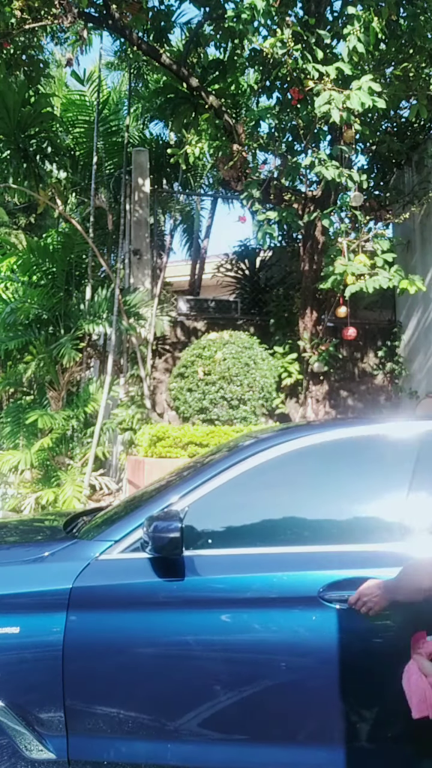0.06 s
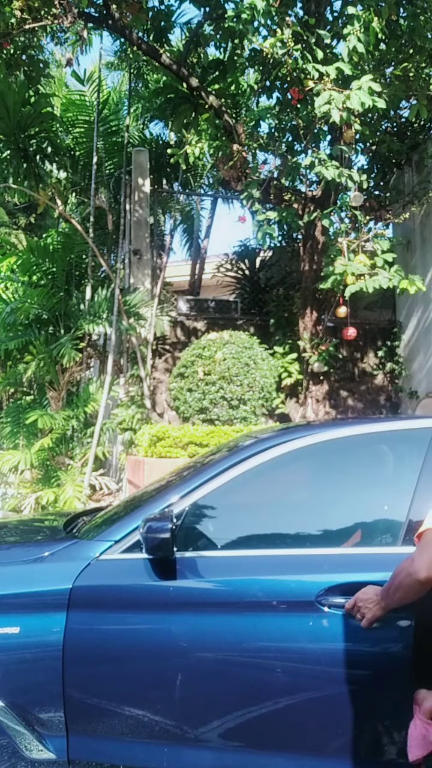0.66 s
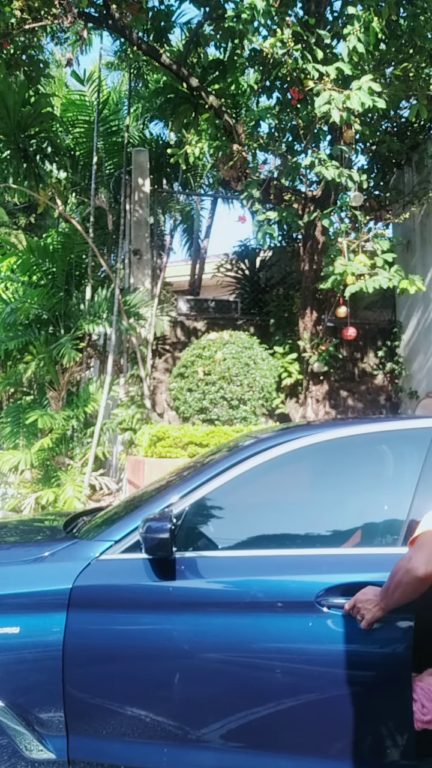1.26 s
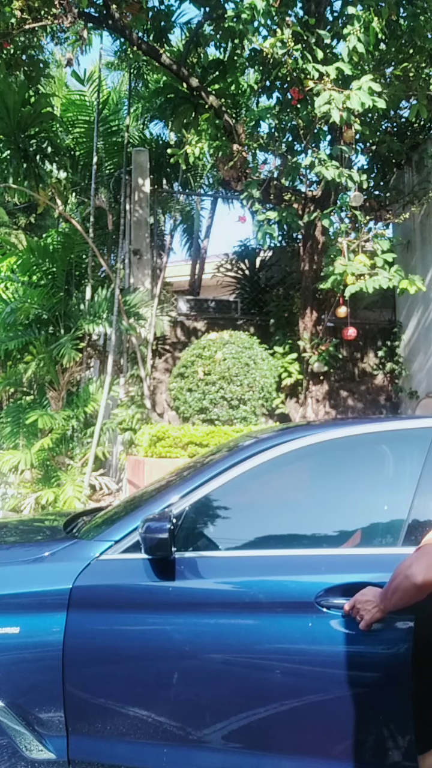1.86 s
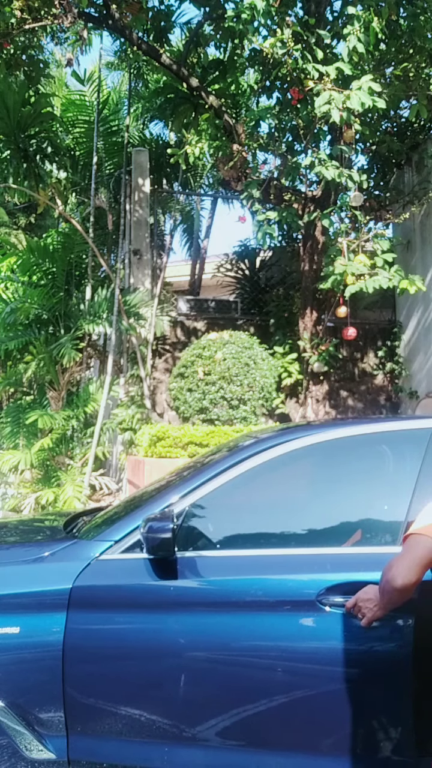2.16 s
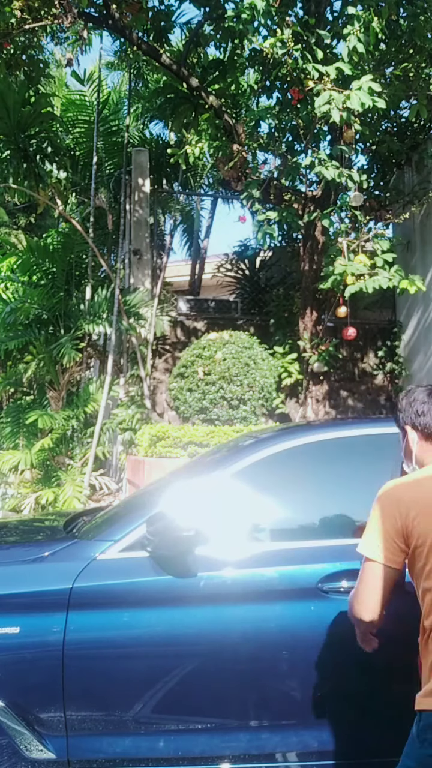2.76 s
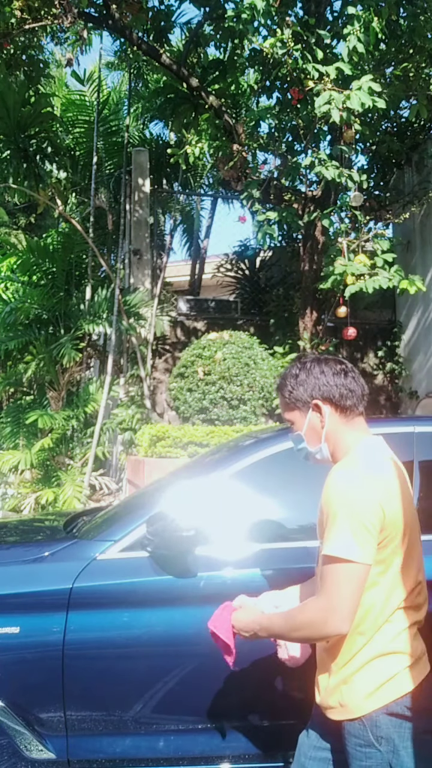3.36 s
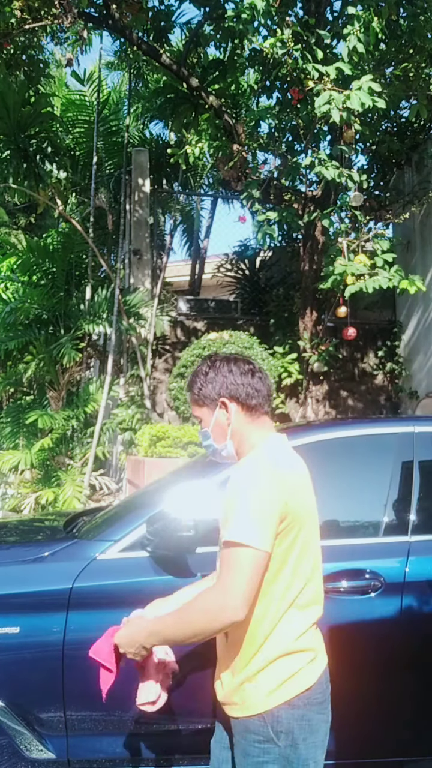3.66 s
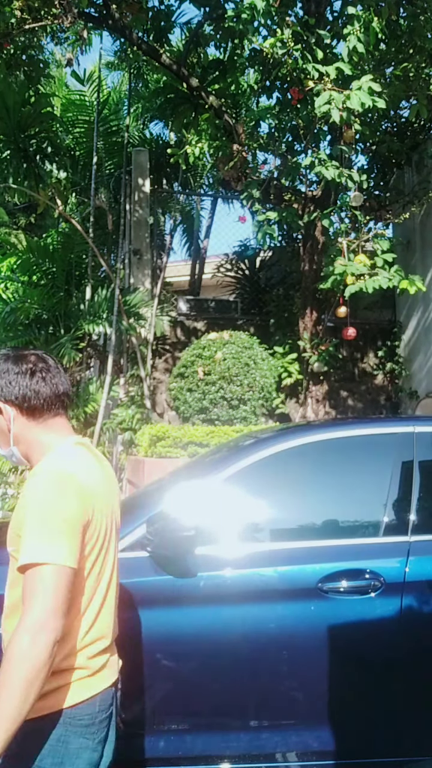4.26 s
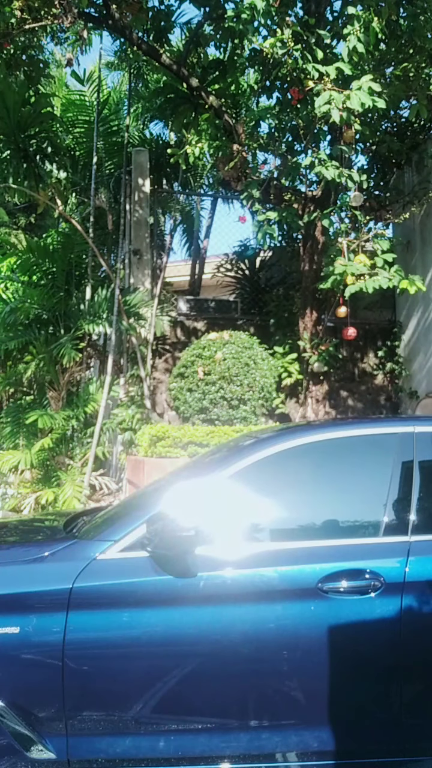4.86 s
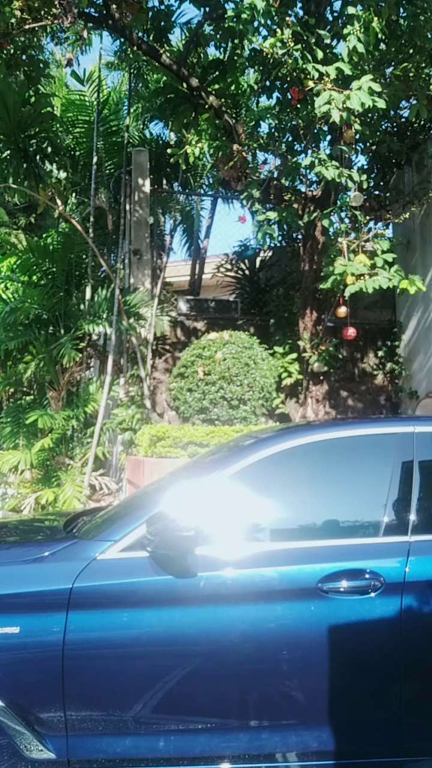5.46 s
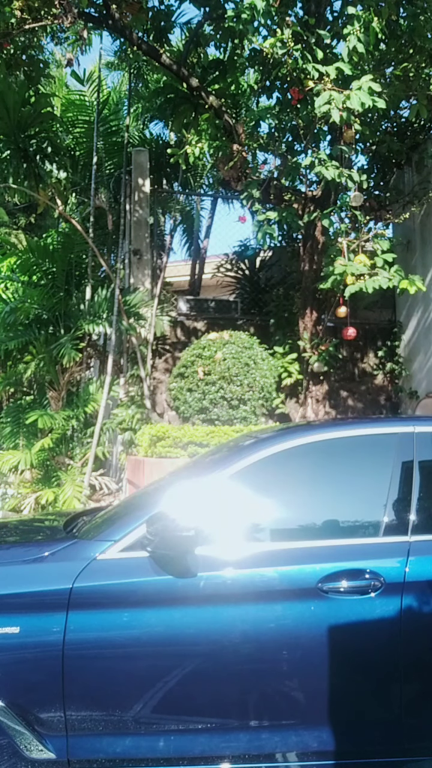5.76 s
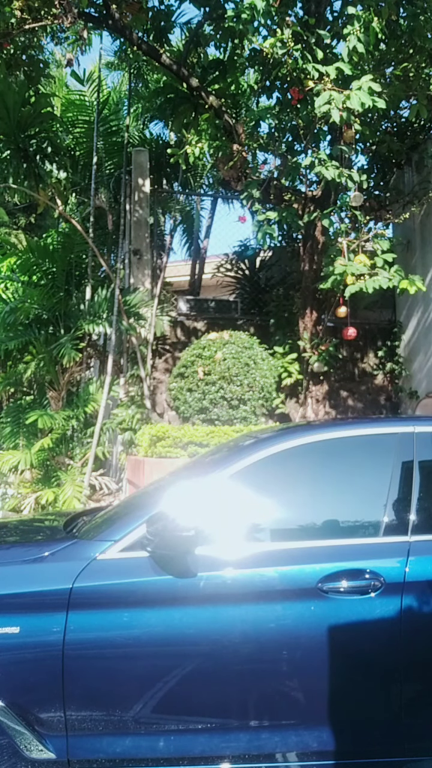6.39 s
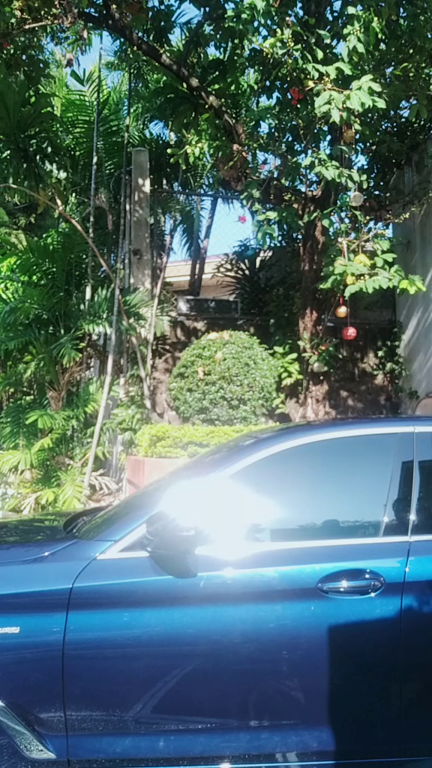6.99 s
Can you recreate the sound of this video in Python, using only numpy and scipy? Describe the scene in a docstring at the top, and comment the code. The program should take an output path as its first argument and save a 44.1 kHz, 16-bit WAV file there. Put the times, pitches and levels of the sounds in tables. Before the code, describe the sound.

A low, steady rumble of far traffic and a thin insect hiss fill an outdoor space. Close by, a handle clicks and a car door closes with a single heavy thud and a metallic catch of the latch. Quiet gritty footsteps, small ticks and swishing clothes follow. Near the end, a small hard object lands slightly further off with a sharp clack and one quick bounce.

```python
"""Shutting a car door in a garden

The handle knocks, the rubber seal meets the frame, the latch snaps, and the door panel and cabin boom.
The person walks off with scuffing steps and rustling clothes. Something hard clacks down and bounces once.
Behind it all are rumbling traffic, one far engine changing speed and a faint hiss of insects."""
import sys
import numpy as np
from scipy import signal
from scipy.fft import rfft, irfft, next_fast_len
from scipy.io import wavfile
from scipy.ndimage import uniform_filter1d

SR = 44100
rng = np.random.default_rng(int(sys.argv[2]) if len(sys.argv) > 2 else 0)


def wav_record(signal):
    """Record a signal, one row per channel, as 16-bit PCM in the file named by sys.argv[1]."""
    frames = np.transpose(np.atleast_2d(signal))
    bounded = np.clip(frames, -1, 1)
    # unit amplitude maps onto the largest positive 16-bit level
    quanta = np.round(bounded * 32767).astype(np.int16)
    wavfile.write(sys.argv[1], SR, quanta)


N = 314433
T = np.arange(N) / SR

# In the tables, fade_s is the time to die away by 60 dB, and contact_s is how long a blow lasts.
# A "colour" says how strong a noise is from low to high. Levels are relative, not final loudness.
# Pushes on the panel, by hand and as the door lands and rebounds: start_s, level_db, contact_s
PANEL_PUSHES = [(1.21, -30, 0.0028), (2.121, -26, 0.0045), (2.6492, -3, 0.0064), (2.69, -7, 0.0061)]
# The buffers stop the door with a blow the other way: start_s, level_db, contact_s
BUFFER_STOPS = [(2.678, -2.5, 0.00482)]
# Tones of the door's wide metal panel: pitch_hz, level_db, fade_s
PANEL_TONES = [(54.3, -39.5, 0.51), (77.6, -23.5, 0.36), (105.4, -29, 0.26), (130, -21.5, 0.22),
               (155, -24, 0.066), (176, -37, 0.15), (243.6, -36, 0.36)]
# Air squeezed into the cabin: start_s, level_db, length_s
AIR_PUSHES = [(2.641, -14, 0.017), (2.677, 7, 0.0096)]
# The cabin's boom: pitch_hz, level_db, fade_s
CABIN_TONES = [(26.7, -36, 0.42)]
# The door meets its frame and settles: start_s, knock_db, contact_s, seal_db
FRAME_HITS = [(2.517, -22.5, 0.0014, -78), (2.603, -23, 0.0018, -63), (2.619, -10, 0.0014, -45),
              (2.6305, -9, .0007, -39.5), (2.634, -3, 0.00015, -44), (2.644, -5.5, 0.00094, -34.5),
              (2.677, -17, 0.000099, -37), (2.690, -6.5, 0.00057, -45.5), (2.717, -18, 0.0015, -48)]
# Tones of the door's shell: pitch_hz, level_db, fade_s
SHELL_TONES = [(316, -59, 0.29), (407, -36.5, 0.16), (438, -40, 0.2), (480, -47, 0.2), (582.4, -37, 0.16),
               (694, -38.5, 0.1), (777, -41, 0.1), (1390, -30, 0.049), (1966, -37.5, 0.061)]
# The seal being squashed: pitch_hz, level_db
SQUASH_COLOUR = [(200, 4), (400, 3), (650, 6.5), (1050, -2.5), (1400, -13), (1750, -9), (2300, -13),
                 (3200, -33), (4500, -31), (7000, -25), (16000, -49)]
# The latch snaps over its catch, notch by notch: start_s, rasp_db, ring_db
LATCH_SNAPS = [(2.6365, -57, -49), (2.6488, -33.5, -34.5), (2.6624, -31.5, -41), (2.673, -37.5, -51)]
# The latch's rasp: pitch_hz, level_db
RASP_COLOUR = [(900, -28), (2100, -5), (2800, -1.5), (3700, -6.5), (4400, -8.5), (5600, -11), (6400, 0),
               (7500, -2), (8700, -6.5), (10800, -17.5), (13500, -5.5), (16000, -12)]
# The latch's ring: pitch_hz, level_db, fade_s
LATCH_TONES = [(3710, -2, 0.032), (6600, -11, 0.031), (7500, 0, 0.034), (7700, -1, .04)]
# The steel edge clashes as the door shuts fully: start_s, level_db, rise_s, fade_s
EDGE_CLASH = [(2.679, -34, 0.0013, 0.047)]
# The noise of that clash: pitch_hz, level_db
EDGE_COLOUR = [(900, -26), (1400, 15), (1750, -8), (2300, 6), (3000, 3.5), (4200, -11), (6400, -5),
               (9000, -34), (16000, -32)]
# The handle is let go and snaps home: start_s, level_db
HANDLE_SNAPS = [(2.0728, -5.5), (2.0772, -1), (2.0822, 0.5)]
# Tones of the handle: pitch_hz, level_db, fade_s
HANDLE_TONES = [(457, -53, 0.042), (707, -34.5, 0.029), (810, -48, 0.05), (1235, -53, 0.041),
                (1500, -55, .03), (2150, -46, 0.02)]

# A hard thing lands and bounces once: start_s, level_db, contact_s
CLACK_HITS = [(5.8746, 1, 0.00056), (5.8770, 2, 0.00012), (5.9019, -1, 0.00028)]
# Tones of the hard thing: pitch_hz, level_db, fade_s
CLACK_TONES = [(588.4, -71, 0.046), (775, -40, 0.035), (1060, -38, 0.016), (1330, -33, 0.038),
               (1406, -33.5, 0.028), (1945, -37.5, 0.033), (2150, -36.5, 0.036), (2640, -46, 0.044),
               (2930, -64, 0.019), (4490, -44, 0.016), (6060, -44, .015), (6350, -43.5, 0.018)]
# Grit crunches under it: start_s, level_db, rise_s, fade_s
CRUNCHES = [(5.8745, -40, 0.0006, 0.025), (5.877, -35, 0.0023, 0.036), (5.902, -46, 0.00054, 0.079),
            (5.912, -54, 0.0046, 0.6)]
# The noise of that crunch: pitch_hz, level_db
CRUNCH_COLOUR = [(330, -34), (750, 7), (1100, -2), (1400, 3.5), (1750, 4.5), (2250, 3), (2900, -6),
                 (3500, -12.5), (6500, -12), (9000, -25), (16000, -21)]
# Soles scuff the ground: start_s, sole_db, grit_db, fade_s
FOOTSTEPS = [(3.617, -55.5, -68, 0.16), (4.13, -56, -68, 0.11), (4.33, -63, -73, .28),
             (4.645, -60, -81, 0.53), (5.352, -52.5, -67, .2), (6.410, -55, -68, 0.28),
             (6.995, -57.5, -78, 0.12)]
# The noise of a sole: pitch_hz, level_db
SOLE_COLOUR = [(400, -1), (1000, -1), (1450, 5.5), (1700, -10), (2100, 7.5), (2600, -9.5), (3300, -3),
               (5000, -15), (7000, -8), (9500, -55), (16000, -52)]
# Clothes swish during the walk: start_s, level_db, rise_s, fade_s
CLOTH_SWISHES = [(3.25, -62.5, 0.13, .5), (3.405, -62.5, .025, 0.37), (3.62, -69.5, 0.055, 0.54),
                 (4.054, -57, 0.032, 0.29), (4.642, -58.5, 0.02, .5), (5.296, -54.5, 0.014, 0.073),
                 (6.30, -69, .032, 0.78)]
# The noise of cloth and of grit underfoot: pitch_hz, level_db
SWISH_COLOUR = [(1200, -32), (2100, 4), (3100, 6.5), (4300, 0.5), (5500, 4.5), (7000, 8), (9000, -3.5),
                (11500, -3.5), (14000, 1.5), (16000, 0)]
# Small ticks of hand and grit: start_s, level_db, fade_s, pitch_hz
SMALL_TICKS = [(1.204, -45, 0.024, 1390), (1.209, -47.5, .06, 1945), (1.569, -58.5, 0.12, 6350),
               (1.59, -55.5, 0.036, 7300), (2.950, -50.5, 0.029, 2620), (3.622, -58, 0.12, 2160),
               (3.79, -52, 0.026, 1850), (4.053, -48, 0.082, 3018), (4.055, -48, 0.04, 4475),
               (4.061, -53, .033, 2000), (4.287, -54.5, 0.054, 2110), (4.929, -39.5, 0.02, 2050),
               (5.065, -51.5, 0.056, 2120), (6.032, -52, 0.055, 1360), (6.755, -50, 0.023, 3940),
               (7.019, -53.5, 0.069, 3700)]
# The crack in each tick: pitch_hz, level_db
CRACK_COLOUR = [(300, 5), (900, 10.5), (1400, 0), (2050, 4.5), (2500, -5), (3000, 4), (4000, -5.5),
                (4800, -11.5), (5600, -10.5), (6800, 1.5), (9000, -26), (14000, -15), (16000, -23)]

# How far traffic rises and falls: time_s, rumble_db, tyre_db
TRAFFIC_LEVELS = [(0.0, -66.5, -62.5), (1.17, -70, -61.5), (6.02, -66, -60.5), (7.13, -66.5, -61)]
# The road's low rumble: pitch_hz, level_db
RUMBLE_COLOUR = [(11, -39), (20, -6.5), (42, 3), (65, -7.5), (85, 4), (125, -2), (150, -3), (200, -6),
                 (260, -15.5), (300, -45), (390, -49)]
# The rush of tyres: pitch_hz, level_db
TYRE_COLOUR = [(160, -20), (280, -4.5), (343, -6), (406, -3), (560, -2), (600, -1.5), (747, -1), (856, -1),
               (1800, -11.5), (2320, -11.5), (4570, -22), (6750, -23.5), (8850, -27.5), (15200, -26.5),
               (16000, -34)]
# The tyres' treble, used only as a change around its average: time_s, level_db
TREBLE_LEVELS = [(0.0, -67.5), (1.53, -69), (2.42, -72.5), (3.33, -68.5), (7.13, -69.5)]
# How fast the far engine fires: time_s, firing_hz
ENGINE_SPEED = [(0.0, 75.6), (0.3, 74.4), (0.67, 64.15), (2.1, 50.1), (2.8, 49.46), (3.22, 51.5),
                (3.43, 59.55), (3.99, 66.7), (5.2, 68.95), (5.98, 75), (7.13, 70.8)]
# The engine's tones: multiple_of_firing_rate, level_db
ENGINE_TONES = [(1, 2), (2, -23.5), (3, -15.5)]
# Firing rates at which the exhaust booms: pitch_hz, width_hz, boost_db
EXHAUST_BOOMS = [(62.8, 1.95, 8.5), (71.55, 1.9, 4.6)]
# Insects call in swells, about twice a second: peak_s, level_db
INSECT_CALLS = [(.33, -72.5), (.85, -75), (1.38, -76.5), (1.98, -83.5), (3.28, -73.5), (3.87, -73),
                (4.8, -84), (5.3, -71.5), (5.48, -70), (6.05, -77), (6.53, -74.5)]
# The insects' hiss: pitch_hz, level_db
HISS_COLOUR = [(5000, -29), (6200, -7.5), (6750, -2), (7250, -3.5), (7800, -11.5), (8800, -18.5),
               (11500, -23), (13600, -10), (16000, -15.5)]
# Echoes from the ground and walls: delay_s, level_db
ECHOES = [(0.011, -15), (0.023, -32), (.033, -24), (0.058, -26)]


def door_boom():
    """The panel bends in and out as the door lands, and the trapped air sways in the cabin."""
    force = blows(shudder() + PANEL_PUSHES) - blows(BUFFER_STOPS)
    return ring(force, PANEL_TONES) + ring(blows(AIR_PUSHES), CABIN_TONES)


def shudder(count=7, start_s=2.1455, gap_s=0.008, contact_s=0.0058):
    """The panel shudders as the door starts to swing: a quick run of soft, uneven pushes."""
    pushes = []
    for k, place in enumerate(np.linspace(-1, 1, count)):
        db = -33 + 1.5 * place ** 2 + 2 * rng.standard_normal()
        pushes.append((start_s + k * gap_s, db, contact_s))
    return pushes


def door_clatter(seal_rise_s=0.0035, seal_fade_s=0.1):
    """The door knocks on its frame and squashes the seal; the latch snaps and the steel edge clashes."""
    knocks = blows([(s, db, contact) for s, db, contact, _ in FRAME_HITS])
    shell = low_cut(ring(knocks, SHELL_TONES), hz=181)
    squashes = bursts([(s, db, seal_rise_s, seal_fade_s) for s, _, _, db in FRAME_HITS])
    seal = squashes * noise(SQUASH_COLOUR)
    return shell + seal + door_latch() + bursts(EDGE_CLASH) * noise(EDGE_COLOUR)


def door_latch(rise_s=0.0008, fade_s=0.049, contact_s=0.00005):
    """The steel latch rasps over its catch and rings at each notch."""
    slides = bursts([(s, db, rise_s, fade_s) for s, db, _ in LATCH_SNAPS])
    strikes = blows([(s, db, contact_s) for s, _, db in LATCH_SNAPS])
    return slides * noise(RASP_COLOUR, grain_db=1.5) + ring(strikes, LATCH_TONES)


def door_handle(contact_s=0.00037, gap_s=0.0208, spring_hz=6760, spring_width_hz=880):
    """The handle is gripped, snaps home with a faint ring of its spring, and bounces ever more softly."""
    grip = (1.3, -16, 0.0011)   # start_s, level_db, contact_s
    home_s = HANDLE_SNAPS[-1][0]
    bounces = [(home_s + (k + 1) * gap_s, -13 - 2 * k) for k in range(3)]
    knocks = blows([grip] + [(s, db, contact_s) for s, db in HANDLE_SNAPS + bounces])
    body = low_cut(ring(knocks, HANDLE_TONES), hz=337)
    rise_s, fade_s = 0.0008, 0.034
    spring_level = bursts([(s, db - 60, rise_s, fade_s) for s, db in HANDLE_SNAPS])
    spring = narrow_band(rng.standard_normal(N), spring_hz, sharpness=spring_hz / spring_width_hz)
    return body + spring_level * spring


def clack():
    """A hard, hollow thing lands on gritty ground and bounces."""
    body = low_cut(ring(blows(CLACK_HITS), CLACK_TONES), hz=583)
    crunch = bursts(CRUNCHES) * noise(CRUNCH_COLOUR, grain_db=2.5)
    return body + crunch


def walking(rise_s=0.0055, boost_db=2.0, flutter_db=1.34):
    """Soles scuff over grit and clothes rustle, both with a rough, grainy sound."""
    scuffs = bursts([(s, db, rise_s, fade) for s, db, _, fade in FOOTSTEPS])
    grit = [(s, db, rise_s, fade) for s, _, db, fade in FOOTSTEPS]
    steps = scuffs * noise(SOLE_COLOUR, grain_db=5.0)
    rustle = bursts(CLOTH_SWISHES + grit) * noise(SWISH_COLOUR, grain_db=5.5)
    return (steps + rustle) * from_db(boost_db + flutter_db * drift(rate_hz=23))


def ticks(rise_s=0.0016, ring_db=-2.0, crack_db=-5.5):
    """Each tick of hand or grit is a tiny crack with a short ring at its own pitch."""
    crack = from_db(crack_db) * noise(CRACK_COLOUR, grain_db=4.0)
    hiss = rng.standard_normal(N)
    sound = np.zeros(N)
    for s, db, fade, hz in SMALL_TICKS:
        tone = from_db(ring_db) * narrow_band(hiss, hz, sharpness=13)
        sound += bursts([(s, db, rise_s, fade)]) * (crack + tone)
    return sound


def traffic(rumble_boost_db=10.0, flutter_db=0.5):
    """A far road rumbles and tyres rush; the treble comes and goes a little."""
    rumble_db, tyre_db = in_time(TRAFFIC_LEVELS)
    treble_db, = in_time(TREBLE_LEVELS)
    rumble = from_db(rumble_db + rumble_boost_db) * noise(RUMBLE_COLOUR)
    tyres = from_db(tyre_db + flutter_db * drift(rate_hz=8.3)) * noise(TYRE_COLOUR)
    treble_change = from_db(treble_db - treble_db.mean()) - 1
    return rumble + tyres + treble_change * low_cut(tyres, hz=2400, order=1)


def far_engine(base_db=-58.5, cruise_hz=70.4, smooth_s=0.62, waver=0.00798, flutter_db=1.5):
    """Only an engine's lowest tones carry this far. It is louder when fast and when speeding up."""
    hz, = in_time(ENGINE_SPEED)
    speed_db = 0.25 * (hz - cruise_hz)
    pull_db = 0.1374 * uniform_filter1d(np.gradient(hz) * SR, int(smooth_s * SR))
    exhaust_db = sum(db / (1 + ((hz - centre) / width) ** 2) for centre, width, db in EXHAUST_BOOMS)
    level_db = base_db + speed_db + pull_db + exhaust_db
    phase = 2 * np.pi * np.cumsum(hz * (1 + waver * drift(rate_hz=10.8))) / SR
    drone = sum(from_db(db) * np.sin(multiple * phase) for multiple, db in ENGINE_TONES)
    return from_db(level_db + flutter_db * drift(rate_hz=11.0)) * unit_level(drone)


def insects(swell_width_s=0.073, steady_db=-80.5, boost_db=3.5, flutter_db=1.5):
    """Insects in the trees call in swells over a thin, steady hiss."""
    swells = sum(from_db(db) ** 2 * np.exp(-((T - s) / swell_width_s) ** 2) for s, db in INSECT_CALLS)
    level = np.sqrt(from_db(steady_db) ** 2 + swells)
    return level * from_db(boost_db + flutter_db * drift(rate_hz=110)) * noise(HISS_COLOUR)


def garden(x, early_db, early_fade_s, late_db, late_fade_s, dull_hz):
    """Add echoes from ground and walls, and a shorter and a longer scatter from the leaves."""
    age = T[:SR]
    echo = np.zeros(SR)
    for db, fade in ((early_db, early_fade_s), (late_db, late_fade_s)):
        tail = rng.standard_normal(SR) * from_db(-60 * age / fade) * np.minimum(age / .012, 1)
        echo += from_db(db) * tail / np.linalg.norm(tail)
    for delay, db in ECHOES:
        echo[int(delay * SR)] += from_db(db)
    echo = signal.sosfilt(signal.butter(1, dull_hz, fs=SR, output="sos"), echo)
    return x + signal.fftconvolve(x, echo)[:N]


def blows(rows):
    """Each blow is a smooth hump of force: the longer the contact, the duller the sound."""
    force = np.zeros(N)
    for s, db, contact in rows:
        start = int(s * SR)
        progress = (np.arange(int(contact * SR) + 1) + .5) / (contact * SR)
        hump = np.sin(np.pi * np.minimum(progress, 1)) ** 2
        force[start:start + len(hump)] += from_db(db) * hump / (hump.sum() + 1e-12)
    return force


def ring(force, tones):
    """A struck object rings with its own fading tones."""
    age = T[:SR // 2]
    ringing = sum(from_db(db - 60 * age / fade) * np.sin(2 * np.pi * hz * age) for hz, db, fade in tones)
    return signal.fftconvolve(force, ringing)[:N]


def bursts(rows):
    """A loudness curve for touches that swell quickly and die away."""
    power = np.zeros(N)
    for s, db, rise, fade in rows:
        start = int(s * SR)
        age = T[:min(N - start, int((rise + fade) * SR))]
        swell = np.minimum(age / rise, 1)
        decay = from_db(db - 60 * np.maximum(age - rise, 0) / fade)
        power[start:start + len(age)] += (swell * decay) ** 2
    return np.sqrt(power)


def noise(colour, grain_db=0):
    """Noise of a given colour; grain turns it into a crowd of uneven clicks."""
    size = next_fast_len(N)
    hz, db = np.transpose(colour)
    log_hz = np.log(np.fft.rfftfreq(size, 1 / SR) + 1)
    outside = np.maximum(np.log(hz[0]) - log_hz, 0) + np.maximum(log_hz - np.log(hz[-1]), 0)
    shape = from_db(np.interp(log_hz, np.log(hz), db) - 40 * outside)   # falls off past the table's ends
    clicks = rng.standard_normal(size) * from_db(grain_db * np.minimum(rng.exponential(1, size), 5))
    return unit_level(irfft(rfft(clicks) * shape, size)[:N])


def drift(rate_hz):
    """A smooth random wobble, about 1 in size."""
    hz = np.fft.rfftfreq(8192, 1 / 1000)
    wobble = irfft(rfft(rng.standard_normal(8192)) / (1 + (hz / rate_hz) ** 2))
    return np.interp(T, np.arange(len(wobble)) / 1000, unit_level(wobble))


def narrow_band(x, hz, sharpness):
    """Keep the part of a noise near one pitch, so that it seems to ring."""
    return unit_level(signal.lfilter(*signal.iirpeak(hz, sharpness, fs=SR), x))


def low_cut(x, hz, order=2):
    """Turn down everything below a pitch."""
    return signal.sosfilt(signal.butter(order, hz, "high", fs=SR, output="sos"), x)


def in_time(rows):
    """Join a table's points with straight lines, one curve for each column after the time."""
    times, *columns = np.transpose(rows)
    return [np.interp(T, times, column) for column in columns]


def from_db(db):
    """Turn decibels into a number to multiply by."""
    return 10 ** (np.asarray(db) / 20)


def unit_level(x):
    """Scale a signal to an average power of 1."""
    return x / np.sqrt(np.mean(x ** 2) + 1e-20)


def scene():
    """The door and the person are close, the clack is further off, and the background lies behind."""
    near = door_handle() + door_clatter() + ticks() + walking()
    near = garden(near, early_db=-14, early_fade_s=0.45, late_db=-16.5, late_fade_s=0.51, dull_hz=17000)
    far = garden(clack(), early_db=-21, early_fade_s=0.14, late_db=-23, late_fade_s=0.95, dull_hz=8000)
    boom = garden(door_boom(), early_db=-26, early_fade_s=0.69, late_db=-21, late_fade_s=0.95, dull_hz=900)
    return (near + far + boom + traffic() + far_engine() + insects())[None]


def record(dry, cutoff_hz=15900):
    """Cut away the very highest treble."""
    return signal.sosfilt(signal.ellip(10, .1, 70, cutoff_hz, fs=SR, output="sos"), dry)


dry = scene()
out = record(dry)
wav_record(out)
```